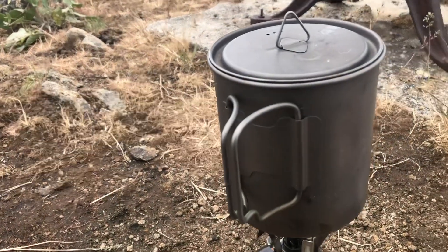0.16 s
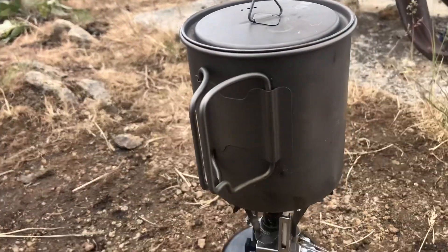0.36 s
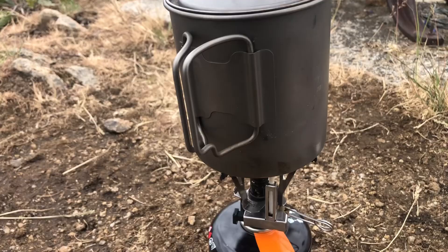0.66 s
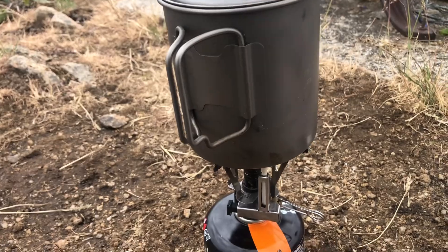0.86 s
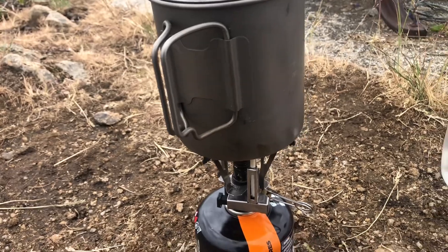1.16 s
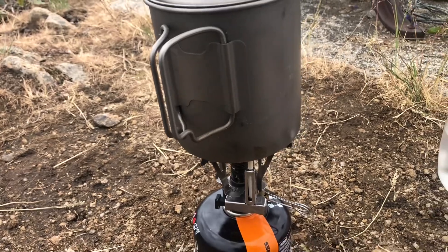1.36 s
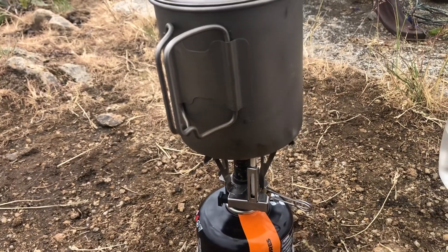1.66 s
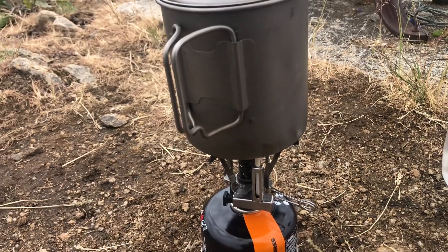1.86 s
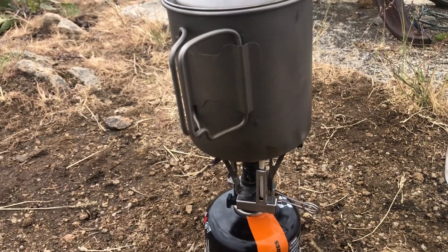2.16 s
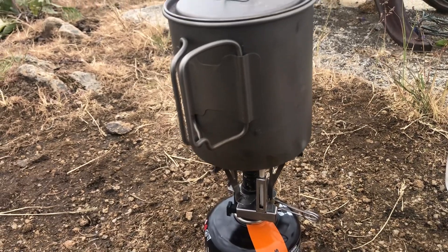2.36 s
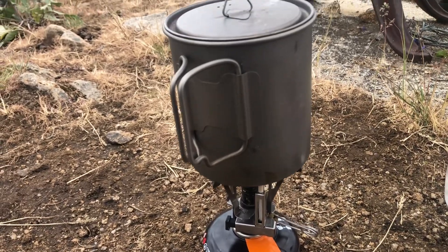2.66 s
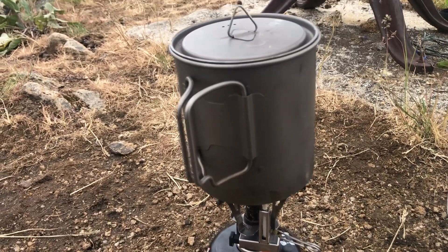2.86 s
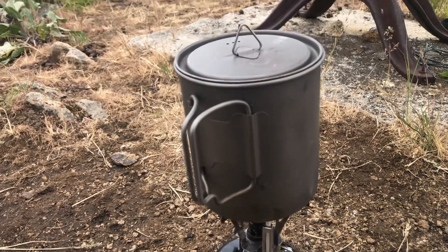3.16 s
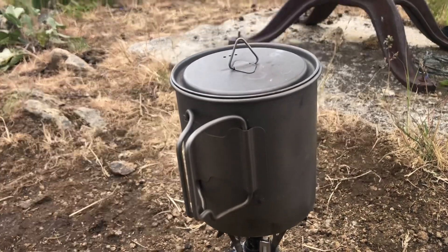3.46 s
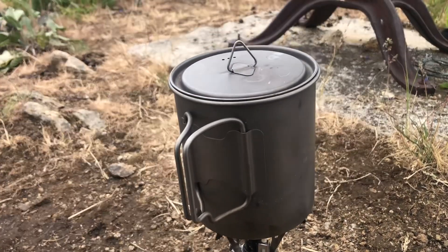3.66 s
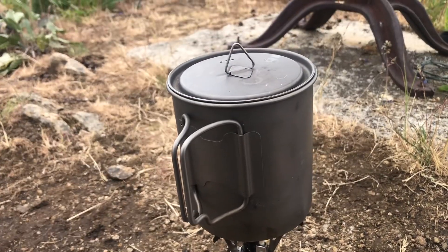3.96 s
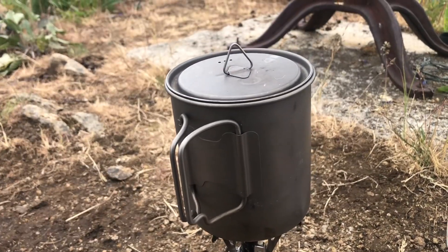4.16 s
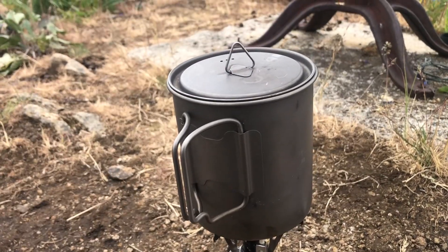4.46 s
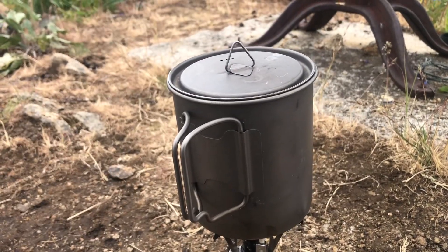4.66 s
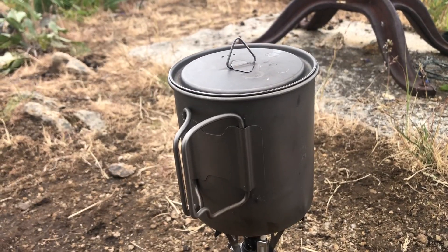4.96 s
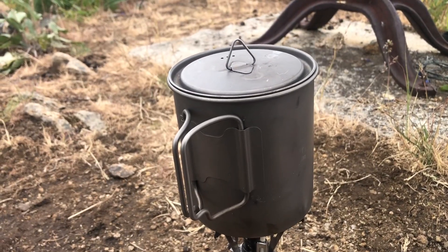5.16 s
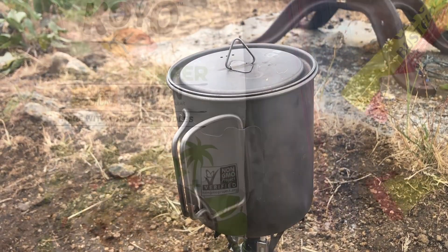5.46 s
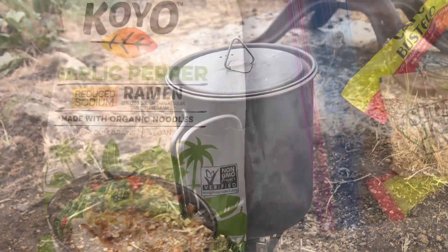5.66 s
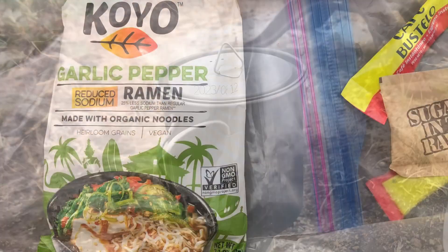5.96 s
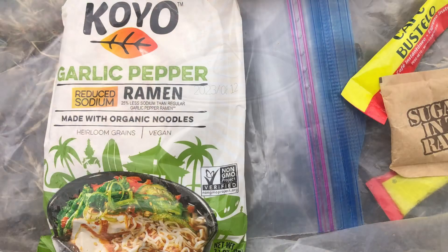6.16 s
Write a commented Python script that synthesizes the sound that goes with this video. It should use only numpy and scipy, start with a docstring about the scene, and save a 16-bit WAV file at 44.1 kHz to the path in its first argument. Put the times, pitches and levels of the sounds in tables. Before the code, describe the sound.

A small camping gas stove burns under a lidded pot outdoors, heard from close by. The gas jet gives a bright, continuous hiss over the low roar and ragged rush of the flame. The tone of the hiss shifts gently as the microphone dips beside the pot and rises again. The flame flutters and surges a little, then the whole sound fades out.

```python
"""A small gas flame roars and rushes against the base of a lidded pot, outdoors and close by.
The gas jet hisses through the burner head's resonances; one unsteady flow drives jet and flame.
As the listener stoops, resonances and notches slide, and a hollow in the top sizzle fills in.
Faint ground echoes and brief glances off metal colour the hiss. The sound fades out at the end."""
import sys
import numpy as np
from scipy import signal
from scipy.fft import rfft, irfft
from scipy.io import wavfile

SR = 44100
rng = np.random.default_rng(int(sys.argv[2]) if len(sys.argv) > 2 else 0)


def bounce(signal):
    """Save signal as a 16-bit WAV file at the path given by the first command-line argument."""
    frames = np.transpose(np.atleast_2d(signal))
    limited = np.clip(frames, -1, 1)
    pcm = np.round(limited * 32767).astype(np.int16)
    wavfile.write(sys.argv[1], SR, pcm)


N = 278103


def undb(db):
    """Decibels to gain."""
    return 10 ** (np.asarray(db) / 20)


def unit(x):
    """Scale to rms 1."""
    return x / np.sqrt(np.mean(x ** 2))


def coloured_noise(spectrum):
    """Noise of rms 1, shaped by (f/Hz, level/dB) points, rolling off past the last."""
    hz, db = np.transpose(spectrum)
    f = np.maximum(np.arange(N // 2 + 1) * SR / N, 1)
    rolloff = np.minimum(hz[-1] / f, 1) ** 4
    gain = undb(np.interp(np.log(f), np.log(hz), db)) * rolloff
    return unit(irfft(rfft(rng.standard_normal(N)) * gain, N))


def flutter(hz):
    """Random fluctuation of rms 1, thinning out above hz."""
    f = np.arange(N // 2 + 1) * SR / N
    gain = f / (f + 2) / np.sqrt(1 + (f / hz) ** 2) / (1 + (f / (10 * hz)) ** 2)
    return unit(irfft(rfft(rng.standard_normal(N)) * gain, N))


def swells(table, t):
    """Sum of smooth bumps, one per row of (centre/s, length/s, height)."""
    return sum(height * np.cos(np.pi * np.clip((t - centre_s) / length_s, -.5, .5)) ** 2
               for centre_s, length_s, height in table)


def between(above, beside, stoop):
    """Blend from above the lid (stoop 0) to beside the pot (stoop 1)."""
    return above + (beside - above) * stoop


# Listener's path: t/s, stoop/0..1
STOOP_PATH = [(0.25, 0.026), (0.95, 0.555), (1.5, 0.92), (2.4, 0.94), (3.0, 0.56), (3.35, 0.61),
              (3.9, 0.21), (4.6, 0.4), (5.4, 0.36)]
# Glances off metal: centre t/s, length/s, reflected share/0..1
METAL_GLANCES = [(0.44, 0.55, 0.46), (1.05, 0.68, 0.2), (3.42, 0.63, 0.5)]

def position(t):
    """The listener's stoop, and the share of sound that glances that way."""
    stoop = np.interp(t, *np.transpose(STOOP_PATH))
    return np.clip([stoop, swells(METAL_GLANCES, t)], 0, 1)


def ground_echoes(f, stoop, lag_range_s=(0.001486, 0.0045), share=0.093, shortening=0.3):
    """Faint echoes off stony soil ripple the spectrum; stooping shortens their paths."""
    lags_s = rng.uniform(*lag_range_s, size=5)
    echoes = sum(np.exp(-2j * np.pi * f * lag_s * (1 - shortening * stoop)) for lag_s in lags_s)
    return abs(1 + share * echoes)


def metal_reflection(f, glance, lag_s=0.000297, corner_hz=7000):
    """Comb from a longer path off metal; the small surface mirrors only treble."""
    share = glance * f / np.hypot(f, corner_hz)
    return abs(1 + share * np.exp(-2j * np.pi * f * lag_s))


# Spectral notches: f above/Hz, f beside/Hz, width/Hz, depth above/dB, depth beside/dB
# Last row: a hollow in the top sizzle near 13 kHz that fills in as the listener stoops.
# Other rows: interference of the paths around the pot.
NOTCHES = [(990, 1110, 121, 5, 19), (2420, 2670, 254, 8.5, 4), (5450, 6270, 540, 6, 9),
           (6740, 7120, 230, 2.5, 0), (8840, 9100, 340, 0, 9), (9680, 10600, 350, -6.5, 10.5),
           (13000, 14450, 690, 11, -2)]

def notch_gain(f, stoop):
    """Notches slide up and change depth as the listener stoops; a negative depth boosts."""
    loss_db = 0
    for above_hz, beside_hz, width_hz, above_db, beside_db in NOTCHES:
        detune = 2 * (f - between(above_hz, beside_hz, stoop)) / width_hz
        loss_db = loss_db + between(above_db, beside_db, stoop) / (1 + detune ** 2)
    return undb(-loss_db)


def at_listener(x, colour, frame_samples=1024):
    """Filter x by colour(f, stoop) and the metal reflection, at constant power."""
    f, t, frames = signal.stft(x, SR, nperseg=frame_samples)
    f = f[:, None]
    stoop, glance = position(t)
    gain = colour(f, stoop) * metal_reflection(f, glance)
    power = np.mean(abs(frames) ** 2, axis=1, keepdims=True)
    gain = gain / np.sqrt(np.sum(power * gain ** 2, axis=0) / power.sum())
    return signal.istft(frames * gain, SR, nperseg=frame_samples)[1][:N]


def burner_head(modes):
    """Jet turbulence rings the head's resonances, coloured by the notches and ground echoes."""
    def colour(f, stoop):
        power = 0
        for above_hz, beside_hz, half_width_hz, above_db, beside_db in modes:
            detune = (f - between(above_hz, beside_hz, stoop)) / half_width_hz
            peak = undb(between(above_db, beside_db, stoop))
            power = power + (peak / (1 + detune ** 2)) ** 2
        return np.sqrt(power) * notch_gain(f, stoop) * ground_echoes(f, stoop)
    return at_listener(rng.standard_normal(N), colour)


# Burner head resonances: f above/Hz, f beside/Hz, half width/Hz, rel. level above/dB, beside/dB
HEAD_MODES = [(2890, 3130, 270, -1.3, -5), (3290, 3770, 760, -6.5, -3), (4780, 4920, 360, -8, -3.5),
              (6100.0, 6630, 1170, -11.5, -8.5), (7280, 7680, 390, -4, -8.5), (8200, 8550, 870, -16.5, -7),
              (10760, 10140, 270, -14, -14), (11950, 11250, 460, -19, -4), (11680, 12200, 640, 1, -11.5),
              (14300.0, 13700, 1560.0, -24, -17)]

def gas_jet(t, burn_db, flow, split_hz=10000, flow_db=0.44, grain_db=0.55, flicker_db=0.67):
    """The jet hisses with the flow, grainy with small eddies; its top modes flicker on their own."""
    stoop, glance = position(t)
    hiss = burner_head([mode for mode in HEAD_MODES if mode[0] < split_hz])
    hiss_db = -47.5 + 0.44 * burn_db + 0.2 * stoop + flow_db * flow + grain_db * flutter(hz=90)
    sizzle = burner_head([mode for mode in HEAD_MODES if mode[0] >= split_hz])
    # The sizzle beams upward, and the reflection partly cancels it.
    sizzle_db = -49.5 - 5 * stoop ** 2 - 4 * glance + flicker_db * flutter(hz=8.3)
    return hiss * undb(hiss_db) + sizzle * undb(sizzle_db)


# Rush spectrum: f/Hz, rel. level/dB
RUSH_SPECTRUM = [(700, -30), (1020, -8), (1220, -6), (1430, -3), (1680, -2), (2000, -7), (2250, -14),
                 (2600, -18), (3400, -30)]

def flame_rush(burn_db, flow, level_db=-45, flow_db=0.53, ragged_db=1.18):
    """The flame rushes along the pot's base, made ragged by its wrinkling front."""
    rush = at_listener(coloured_noise(RUSH_SPECTRUM), notch_gain)
    return rush * undb(level_db + burn_db + flow_db * flow + ragged_db * flutter(hz=45))


# Combustion spectrum: f/Hz, rel. level/dB
ROAR_SPECTRUM = [(20, -52), (30, -36), (48, -23), (63, -12.5), (80, -8.5), (120, -2.5), (260, -0.5),
                 (470, -1), (540, -6), (605, -4), (690, -12), (785, -15), (870, -11), (1100, -20)]

def flame_roar(t, burn_db, flow, level_db=-39.5, stoop_db=1.17, flow_db=0.14):
    """Turbulent combustion roars low, slightly louder when heard level with the flame."""
    stoop, _ = position(t)
    roar = at_listener(coloured_noise(ROAR_SPECTRUM), notch_gain)
    return roar * undb(level_db + 0.48 * burn_db + stoop_db * stoop + flow_db * flow)


# Flame flares (+) and sinks (-): centre t/s, length/s, rush level change/dB
FLAME_SURGES = [(0.54, 0.3, 1), (1.13, 0.51, 1), (2.05, 0.38, 1.3), (3.25, 0.6, 0.8), (3.85, 0.2, 1.3),
                (4.12, 0.71, -2.5), (4.33, 0.21, 3), (4.48, 0.47, -2.0), (4.8, 0.43, -2.7)]

def scene(easing_db_per_s=0.35):
    """One gas flow drives flame and jet: it eases slowly, surges at times and always flutters."""
    t = np.arange(N) / SR
    burn_db = swells(FLAME_SURGES, t) - easing_db_per_s * t
    flow = flutter(hz=9.9)
    flame = flame_roar(t, burn_db, flow) + flame_rush(burn_db, flow)
    return (flame + gas_jet(t, burn_db, flow))[None]


def record(dry, fade_span_s=(5.29, 6.3), cutoff_hz=15700):
    """Linear fade to silence, then a steep low-pass."""
    fade = np.interp(np.arange(N) / SR, fade_span_s, [1, 0])
    lowpass = signal.ellip(12, .1, 70, cutoff_hz, fs=SR, output="sos")
    return signal.sosfilt(lowpass, dry * fade)


dry = scene()
out = record(dry)
bounce(out)
```